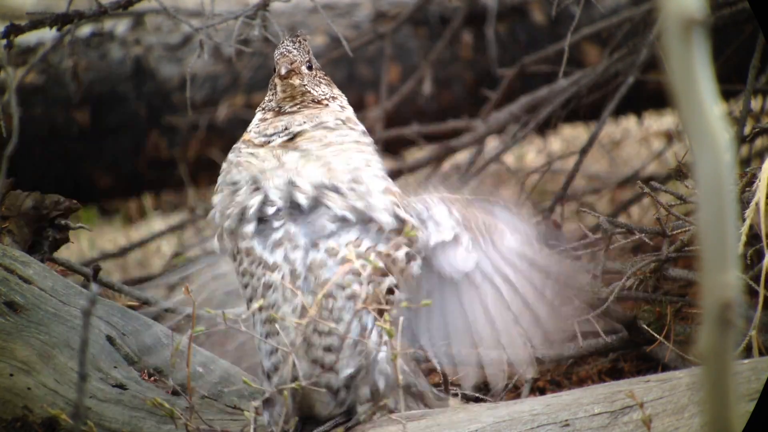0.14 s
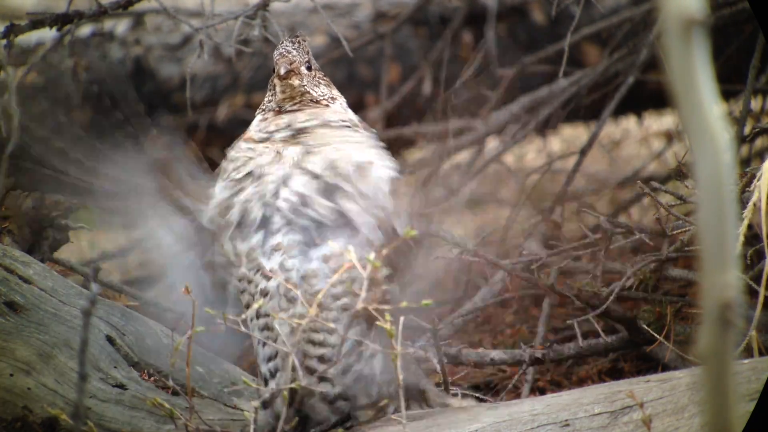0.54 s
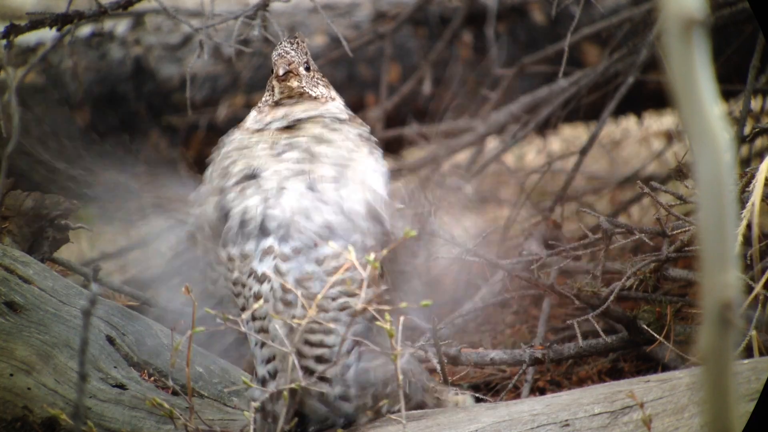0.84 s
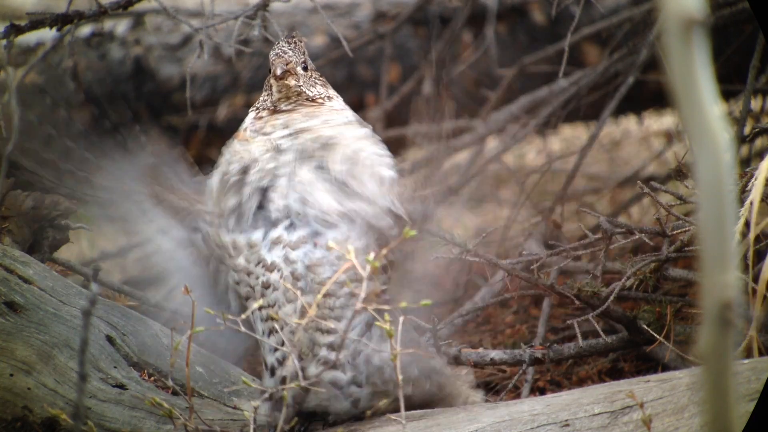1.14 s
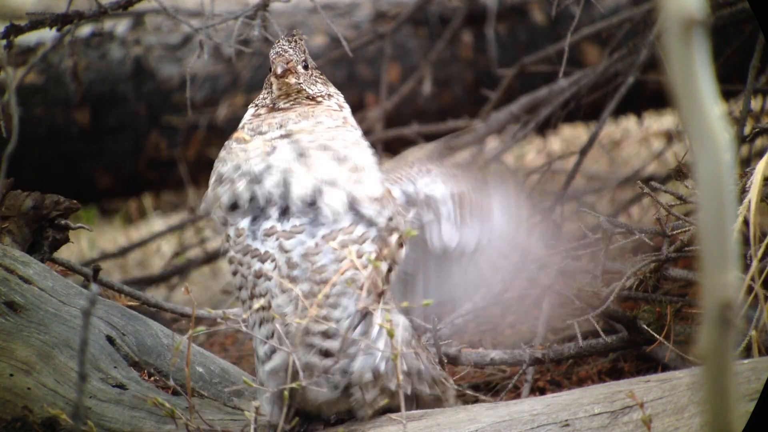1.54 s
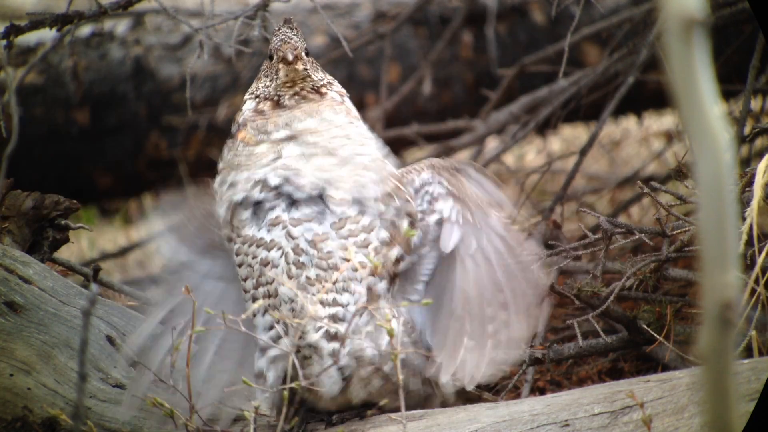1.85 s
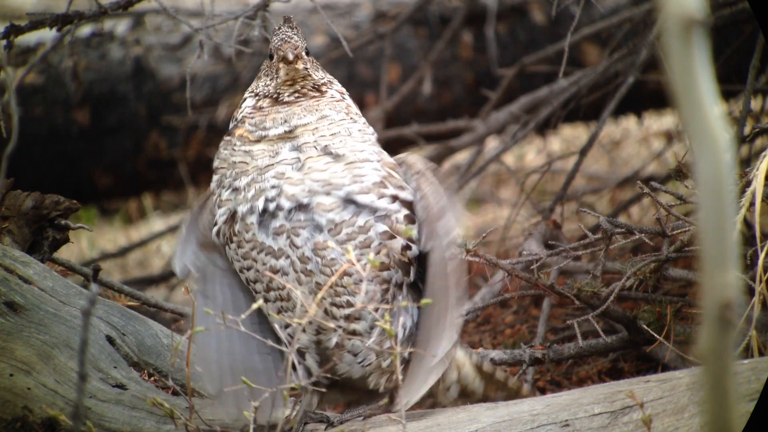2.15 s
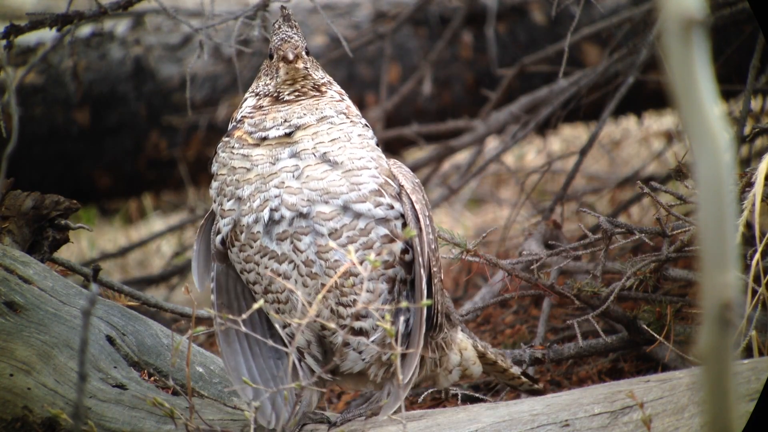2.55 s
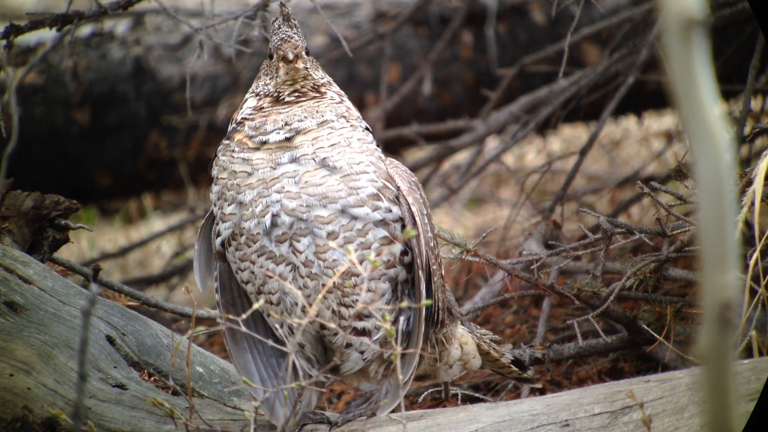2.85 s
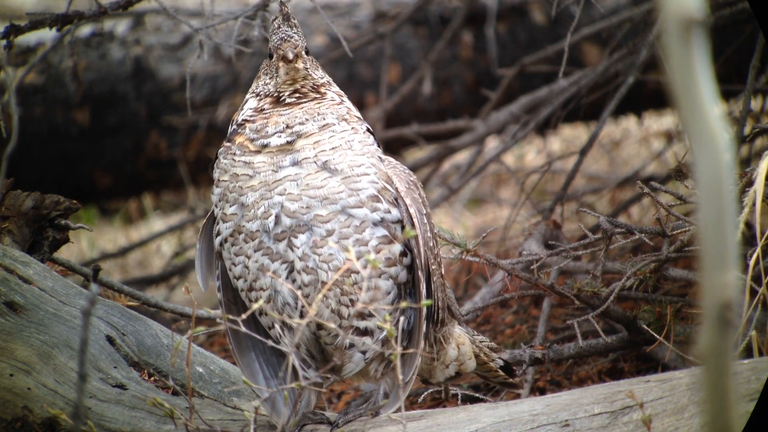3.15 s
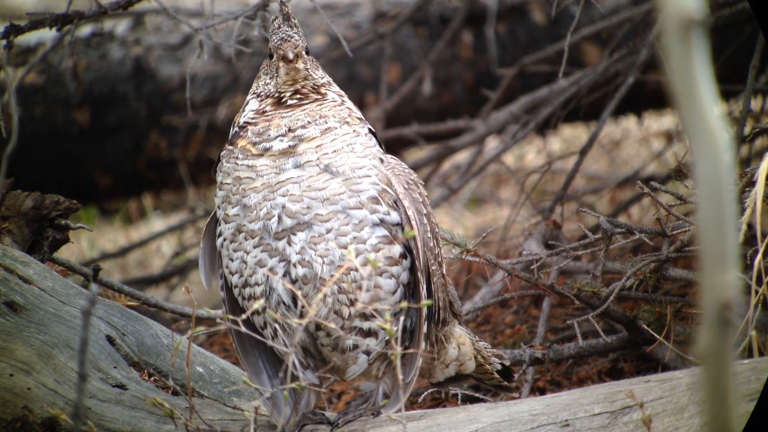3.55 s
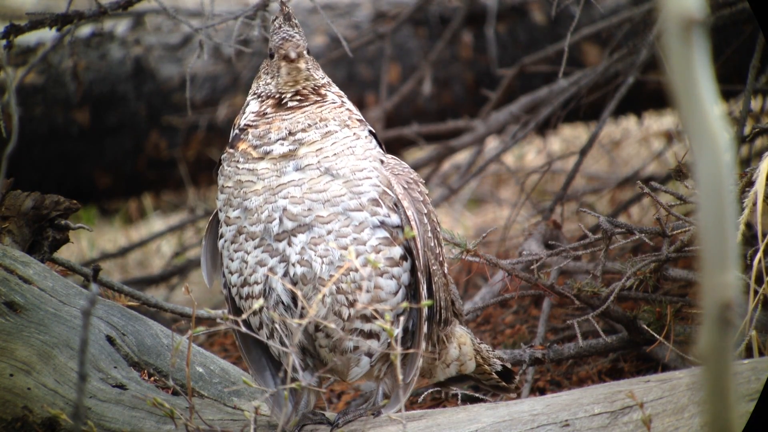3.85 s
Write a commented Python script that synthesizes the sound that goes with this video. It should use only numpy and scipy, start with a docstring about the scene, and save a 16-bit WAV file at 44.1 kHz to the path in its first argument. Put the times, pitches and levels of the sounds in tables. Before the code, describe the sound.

Grouse wing drumming: low, dull thuds speed up, then slow and end, leaving faint forest hush.

```python
"""A grouse on a log drums its wings: low thumps, each a bell-shaped pressure rise and pull, quicken for a second.
They slow again and stop after two seconds; noise bursts add wing-tip flutter and feather rustle.
During and after the drumming a distant bird chirps three times, with two fainter notes: gliding sines with echoes.
Throughout, shaped noise gives the far wind in the crowns, the hush of the forest and microphone hiss."""
import sys
import numpy as np
from scipy import signal
from scipy.io import wavfile
from scipy.ndimage import uniform_filter1d

SR = 44100
rng = np.random.default_rng(int(sys.argv[2]) if len(sys.argv) > 2 else 0)


def gain_from_db(level_db):
    """Convert decibel levels to linear amplitude factors (20 dB per decade)."""
    decades = np.asarray(level_db, float) / 20
    return 10 ** decades


def digitize_waveform(pressure):
    """Quantize a signal to 16-bit integers and store it at the path in sys.argv[1].

    Rows of a 2-D input are taken as channels; values are limited to [-1, 1].
    """
    field = np.atleast_2d(pressure).T
    bounded = np.clip(field, -1, 1)
    quanta = np.round(bounded * 32767).astype(np.int16)
    wavfile.write(sys.argv[1], SR, quanta)


N = 176400
T = np.arange(N) / SR

# Hush of forest and microphone, relative spectral density: hz, density_db
HUSH_SPECTRUM = [(12, -26), (30, 2), (50, -3.5), (80, -13), (125, -10.5), (200, -7), (300, -6), (450, -8.5),
                 (700, -13.5), (1000, -17), (1400, -20), (2200, -19), (3200, -17.5), (4000, -15),
                 (5000, -16.5), (8000, -18), (15300, -19.5)]
# Slow change of the hush about its mean level: time_s, gain_db
HUSH_GAIN = [(0, 1), (.5, .5), (1, 0.8), (1.5, 0.4), (2, -0.04), (2.5, 1), (3, 0), (3.5, 0.24), (4, 0)]
HUSH_DB = -63.5

# Far wind in the crowns, relative spectral density: hz, density_db
WIND_SPECTRUM = [(200, -60), (330, -18.5), (430, -5.5), (520, 0), (600, -4.5), (720, -11.5), (900, -26.5),
                 (1200, -87)]
# Level of the far wind: time_s, level_db
WIND_LEVEL = [(0, -71.5), (.5, -71), (1.2, -71), (2, -70.5), (2.8, -71.5), (3.2, -68.5), (3.55, -73),
              (3.8, -69.5), (4, -71)]

# Chirp notes: start_s, length_s, from_hz, to_hz, glide_ms, peak_db, growth_db, echo_db
CHIRP_NOTES = [(.378, .03, 3700, 5150, 14, -68, 2, -71), (.394, 0.04, 2950, 3850, 7.05, -55.5, 14, -70),
               (2.224, .05, 3200, 6280, 5.5, -65, -4.5, -72.5),
               (2.23, 0.05, 3000, 3644, 3.95, -58.5, 13, -66.5),
               (2.271, 0.0095, 3650, 2800, 10, -63, 0, -72), (2, .009, 3500, 4700, 10, -65, 0, -76),
               (3.396, .018, 5800, 5700, 8, -70, 0.5, -81.5), (3.394, .036, 3800, 3740, 15, -64, 8, -65.5),
               (3.426, 0.0125, 3750, 2970, 11, -65, 0, -70), (3.08, 0.0226, 3000, 2800, 8, -75, -4, -80)]
NOTE_EDGE_S, WAVER_RMS_HZ, BIRD_T60_S = 0.0031, 45, 0.5

# Wing beats: time_s, level_db, after_push (share of the pull), stroke_ms
WING_BEATS = [(0.0922, -27.1, -0.39, 3.63), (0.2126, -26.1, -0.18, 4.14), (0.3235, -26.5, 0.113, 5.26),
              (0.424, -27, -0.078, 4.69), (0.5181, -27.5, 0.035, 4.96), (0.6022, -29.5, -0.33, 4.25),
              (0.681, -28.5, -0.264, 4.06), (0.7526, -28.5, -0.0024, 4.47), (0.8187, -29, 0.082, 5.4),
              (0.8781, -28.1, 0.019, 5.07), (0.9301, -30, 0.14, 4.9), (0.9753, -30, -0.21, 4.1),
              (1.0246, -30.6, -0.57, 4.4), (1.085, -28.5, 0.12, 5.04), (1.146, -29, 0.038, 5.32),
              (1.2109, -29.5, 0.25, 5.6), (1.2808, -28.5, -0.029, 5.17), (1.3535, -30.5, -0.52, 3.84),
              (1.4335, -30, -0.37, 3.8), (1.5196, -30, -0.46, 4.23), (1.6154, -28, 0.01, 5.21),
              (1.714, -29, -0.29, 4.39), (1.8215, -29, -0.22, 4.38), (1.937, -27.5, -0.056, 4.84),
              (2.0615, -28.5, -0.26, 3.97)]
# Beat shape: heights as a share of the pull; centres and widths in strokes
PILE_HEIGHT, PILE_AT, PILE_WIDTH = 0.92, -1.196, 0.858
PULL_AT, PULL_WIDTH = -0.45, 0.54
AFTER_AT, AFTER_WIDTH = 0.569, 0.4035
# Weak return strokes between the beats: time_s, level_db, sign (1 push, -1 pull)
RETURN_STROKES = [(0.229, -47, 1), (.406, -56, -1), (.843, -44, 1), (0.901, -56, 1), (.961, -47, -1),
                  (1.009, -49, -1), (1.051, -48, 1), (1.11, -46, 1), (1.126, -52, 1), (1.171, -50, 1),
                  (1.245, -62.5, 1), (1.735, -55, 1)]
RETURN_WIDTH_S = 0.0022
WING_T60_S, WING_ECHO_DB = 0.58, -25

# Level of the air stirred between the beats: time_s, level_db
EDDY_LEVEL = [(0, -68.5), (.5, -67), (.8, -65.5), (1.0, -65), (1.2, -63), (1.5, -68), (2.05, -74),
              (2.2, -76), (2.4, -92.5)]
# Stirred air, relative spectral density: hz, density_db
EDDY_SPECTRUM = [(20, -8), (50, -1.5), (90, -4.5), (150, -9), (220, -12.5), (320, -44.5), (500, -81)]
# Wing-tip flutter, relative spectral density: hz, density_db
FLUTTER_SPECTRUM = [(40, -59), (100, -21), (140, -0.5), (165, -2.5), (195, -7), (250, -30), (400, -80)]
# Level of the flutter in each beat: time_s, level_db
FLUTTER_LEVEL = [(0, -60), (.6, -64), (.8, -58.5), (.95, -52), (1.1, -54.5), (1.2, -59.5), (1.45, -67),
                 (1.62, -61), (1.8, -70), (2.1, -64)]
FLUTTER_WIDTH_S = 0.0083
# Feather rustle, relative spectral density: hz, density_db
RUSTLE_SPECTRUM = [(100, -50.5), (200, -12), (350, -4.5), (1000, -3.5), (2500, -6), (6000, -10.5),
                   (15000, -25)]
RUSTLE_DB, RUSTLE_LEAD_S, RUSTLE_WIDTH_S = -76.5, 0.004, 0.0077
RUSTLE_BED, RUSTLE_BED_WIDTH_S = 0.51, 0.029  # broader rustle around each beat, as a share of the sharp one


def evened(x):
    """Normalisation: a signal divided by its root mean square has unit rms."""
    return x / np.sqrt(np.mean(x ** 2) + 1e-20)


def hump(t, at, width):
    """Gaussian pulse: a smooth bell of unit height and given standard deviation."""
    return np.exp(-0.5 * ((t - at) / width) ** 2)


def curve(points):
    """Level envelope: decibels interpolated linearly in time, returned as a gain."""
    return gain_from_db(np.interp(T, *np.transpose(points)))


def noise(spectrum, patch_db, drift_db):
    """Spectral shaping: random Fourier frames are weighted by a spectrum with patches and drift (dB rms)."""
    frames = N // 512 + 5
    hz = np.fft.rfftfreq(2048, 1 / SR)
    real, imaginary, patches = rng.standard_normal((frames, len(hz), 3)).T
    patches = uniform_filter1d(patches, size=20, axis=0)  # smooth over frequency
    patches = evened(uniform_filter1d(patches, size=8, axis=1))  # smooth over time
    drift = evened(uniform_filter1d(rng.standard_normal(frames), size=20))
    f, db = np.transpose(spectrum)
    shape_db = np.interp(np.log(hz + 1), np.log(f + 1), db)[:, None]
    field = (real + 1j * imaginary) * gain_from_db(shape_db + patch_db * patches + drift_db * drift)
    return evened(signal.istft(field, nperseg=2048, noverlap=1536)[1][:N])


def echoes(x, t60):
    """Multiple scattering from trunks: convolution with sparse random echoes, falling 60 dB in t60 seconds."""
    t = np.arange(SR) / SR
    arrivals = rng.standard_normal(SR) * (rng.random(SR) < 0.05)
    onset = np.clip(t / 0.04 - 0.3, 0, 1)  # silent for 12 ms, full at 52 ms
    tail = arrivals * gain_from_db(-60 * t / t60) * onset
    return signal.fftconvolve(x, tail / np.linalg.norm(tail))[:N]


def forest_hush():
    """Stationary background: broadband noise of forest and microphone under a slowly varying gain."""
    return gain_from_db(HUSH_DB) * curve(HUSH_GAIN) * noise(HUSH_SPECTRUM, 0.6157, 0.29)


def far_wind():
    """Band-limited turbulence noise: wind in distant crowns, strongest near 520 Hz."""
    return curve(WIND_LEVEL) * noise(WIND_SPECTRUM, 1.4, 0.5)


def far_bird():
    """Frequency modulation: whistled sines glide exponentially to their pitch while growing or fading."""
    direct, scattered = np.zeros((2, N))
    waver_hz = WAVER_RMS_HZ * evened(uniform_filter1d(rng.standard_normal(N), size=150))
    for start_s, length_s, from_hz, to_hz, glide_ms, peak_db, growth_db, echo_db in CHIRP_NOTES:
        t = np.clip(T - start_s, 0, length_s)
        hz = to_hz + (from_hz - to_hz) * np.exp(-1000 * t / glide_ms) + waver_hz
        edges = np.clip(np.minimum(t, length_s - t) / NOTE_EDGE_S, 0, 1)
        growth = gain_from_db(growth_db * np.sqrt(t / length_s) - max(growth_db, 0))
        note = edges * growth * np.sin(2 * np.pi * np.cumsum(hz) / SR)
        direct += gain_from_db(peak_db) * note
        scattered += gain_from_db(echo_db) * note
    return direct + echoes(scattered, BIRD_T60_S)


def wing_pressure():
    """Displacement of air: each beat piles air up, pulls it away and lets it settle; trunks scatter the pulses."""
    air = np.zeros(N)
    for time_s, level_db, after_push, stroke_ms in WING_BEATS:
        strokes = (T - time_s) * 1000 / stroke_ms  # time counted in strokes
        pile = PILE_HEIGHT * hump(strokes, PILE_AT, PILE_WIDTH)
        pull = hump(strokes, PULL_AT, PULL_WIDTH)
        settling = after_push * hump(strokes, AFTER_AT, AFTER_WIDTH)
        air += gain_from_db(level_db) * (pile - pull + settling)
    for time_s, level_db, sign in RETURN_STROKES:
        air += sign * gain_from_db(level_db) * hump(T, time_s, RETURN_WIDTH_S)
    return air + gain_from_db(WING_ECHO_DB) * echoes(air, WING_T60_S)


def wing_turbulence():
    """Amplitude-modulated noise: eddies between beats, wing-tip flutter and feather rustle around each."""
    rustle, flutter = np.zeros((2, N))
    for time_s, *_ in WING_BEATS:
        rustle += hump(T, time_s - RUSTLE_LEAD_S, RUSTLE_WIDTH_S)
        rustle += RUSTLE_BED * hump(T, time_s, RUSTLE_BED_WIDTH_S)
        flutter += hump(T, time_s, FLUTTER_WIDTH_S)
    eddies = curve(EDDY_LEVEL) * noise(EDDY_SPECTRUM, 2.5, 1.5)
    tips = flutter * curve(FLUTTER_LEVEL) * noise(FLUTTER_SPECTRUM, 0, 0)
    feathers = gain_from_db(RUSTLE_DB) * rustle * noise(RUSTLE_SPECTRUM, 2.2, 0.29)
    return eddies + tips + feathers


def scene():
    """Superposition: the sound pressures of background, bird and wings add linearly in one channel."""
    background = forest_hush() + far_wind()
    wings = wing_pressure() + wing_turbulence()
    return (background + far_bird() + wings)[None]


def roll_off(x):
    """The treble ends steeply here."""
    return signal.sosfilt(signal.butter(12, 15390, fs=SR, output="sos"), x)


def record(dry):
    """High-pass filtering: a resonant microphone cut with a slight bump, then a first-order coupling cut."""
    w = 2 * np.pi * 76.5  # microphone corner, rad/s
    q = 1.284
    cut = signal.lfilter(*signal.bilinear([1, 0, 0], [1, w / q, w * w], SR), dry)
    coupling = 2 * np.pi * 22.5  # coupling corner, rad/s
    mix = signal.lfilter(*signal.bilinear([1, 0], [1, coupling], SR), cut)
    return roll_off(mix)


dry = scene()
out = record(dry)
digitize_waveform(out)
```